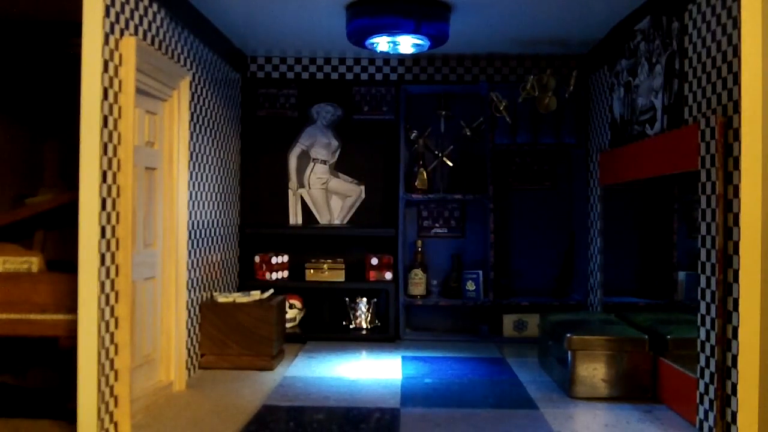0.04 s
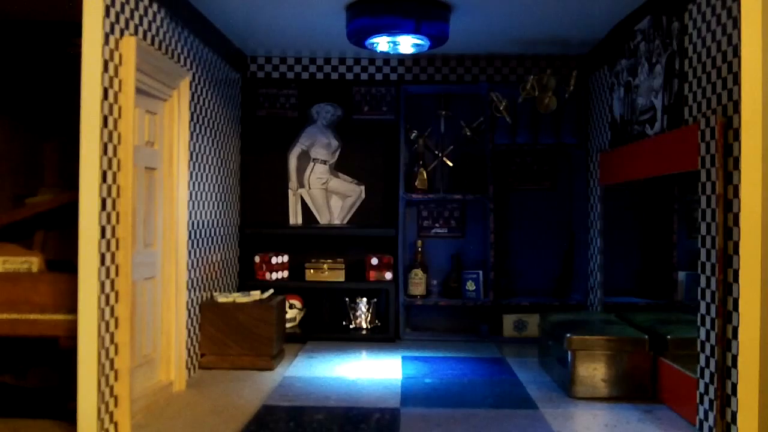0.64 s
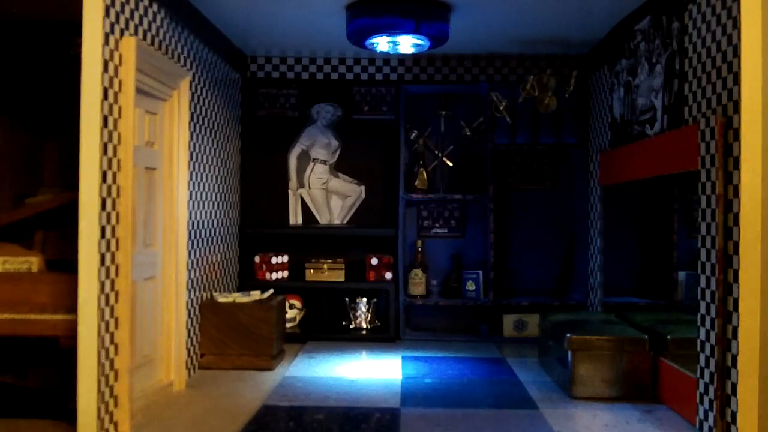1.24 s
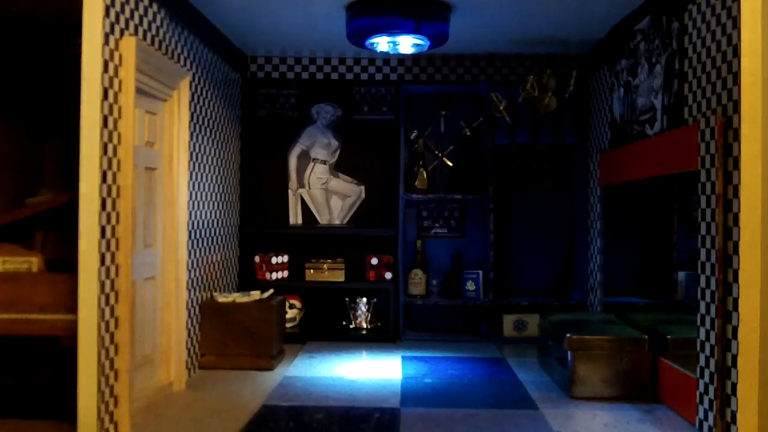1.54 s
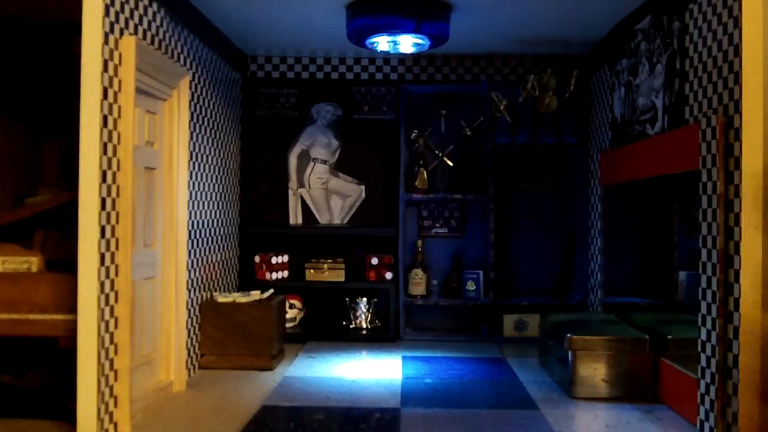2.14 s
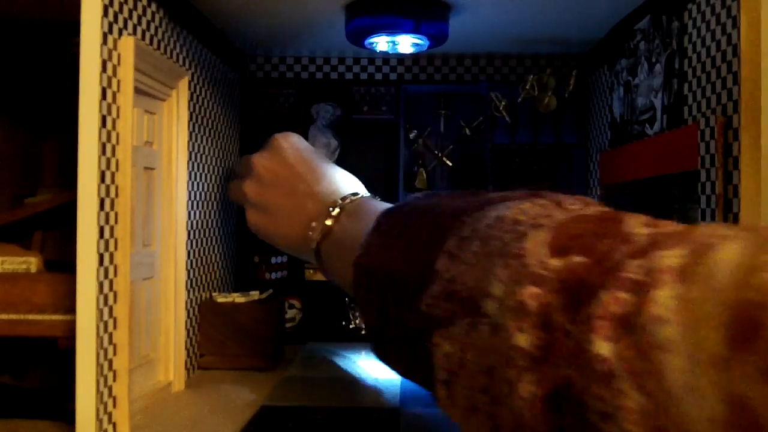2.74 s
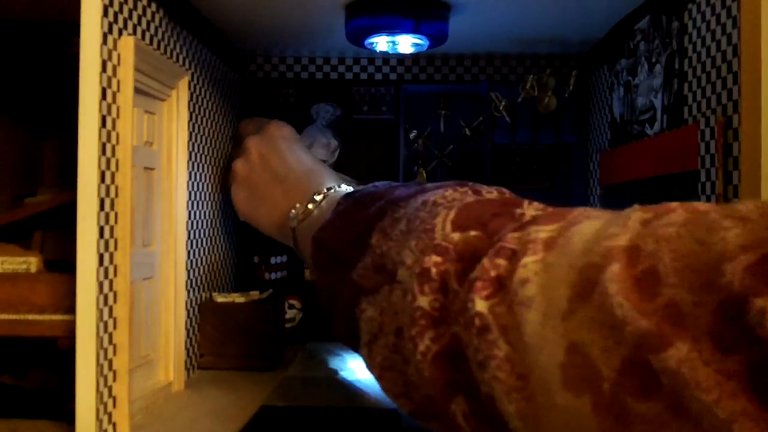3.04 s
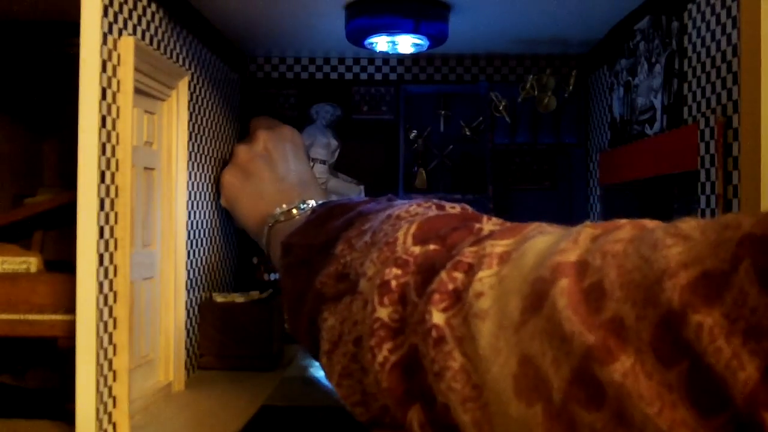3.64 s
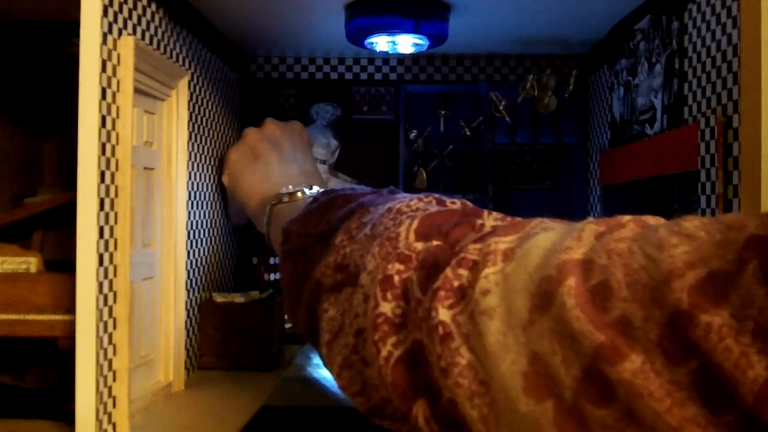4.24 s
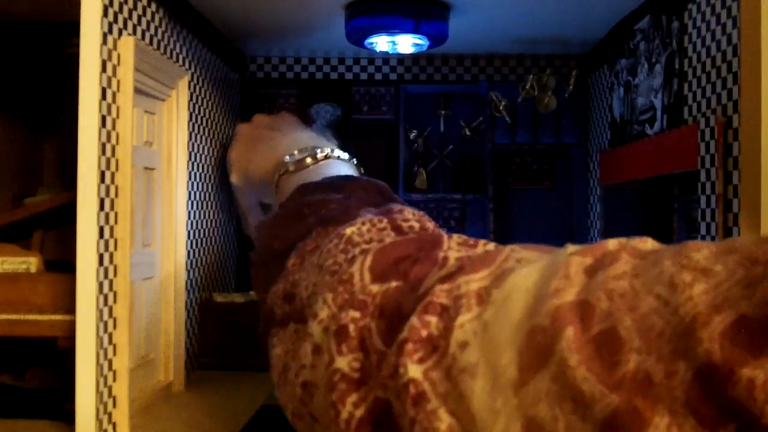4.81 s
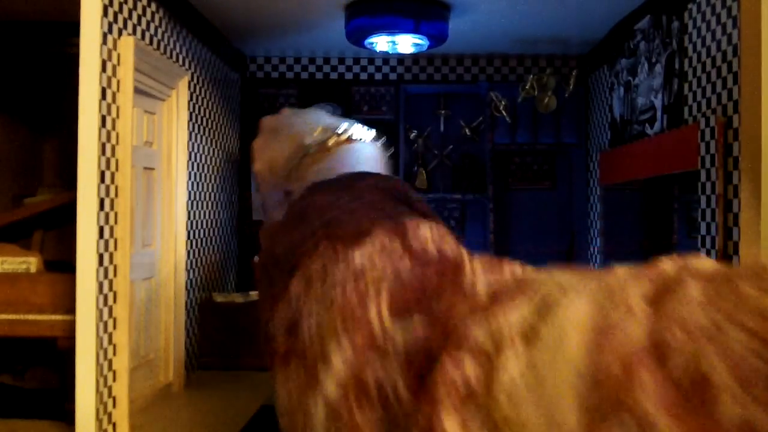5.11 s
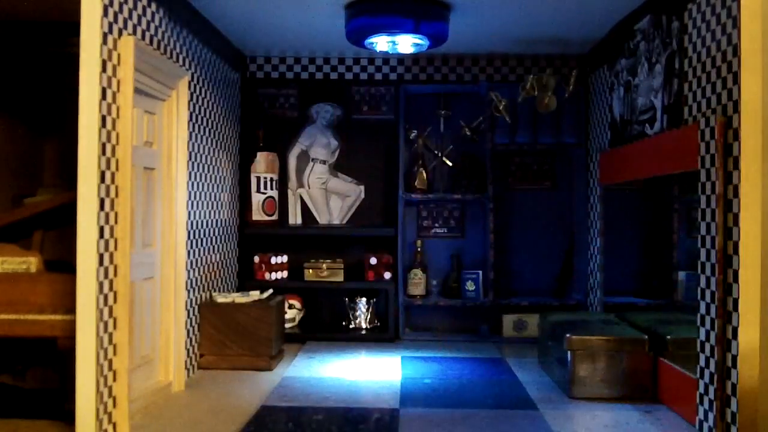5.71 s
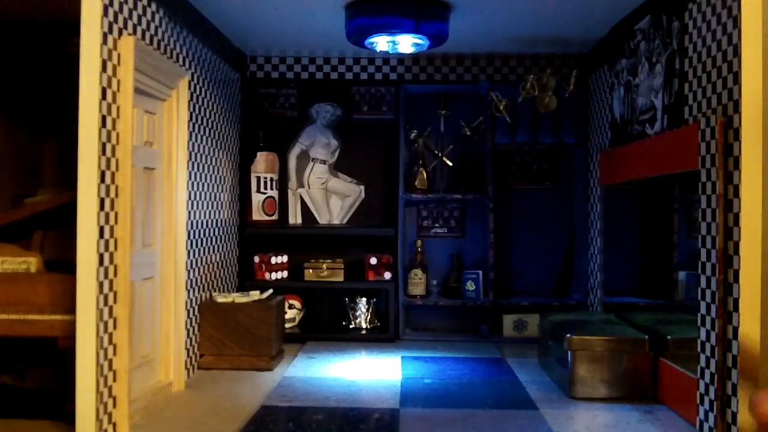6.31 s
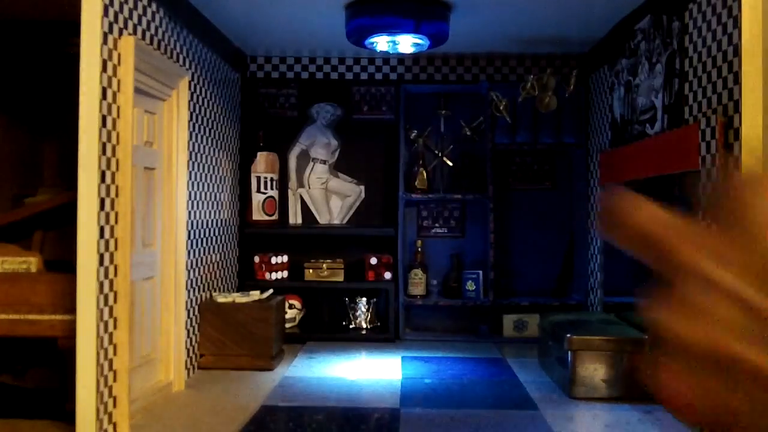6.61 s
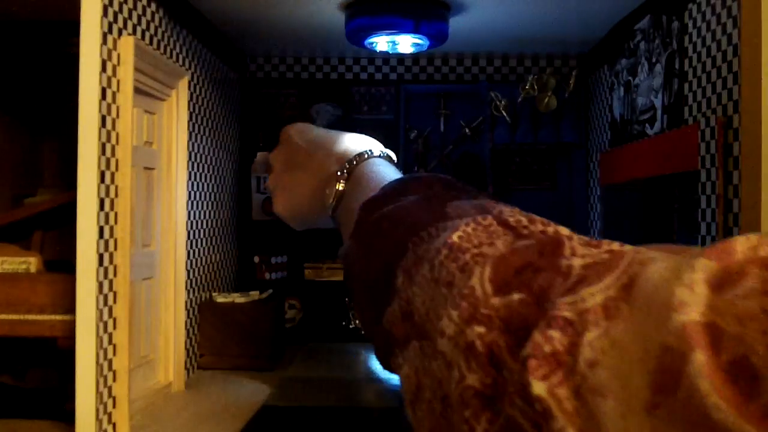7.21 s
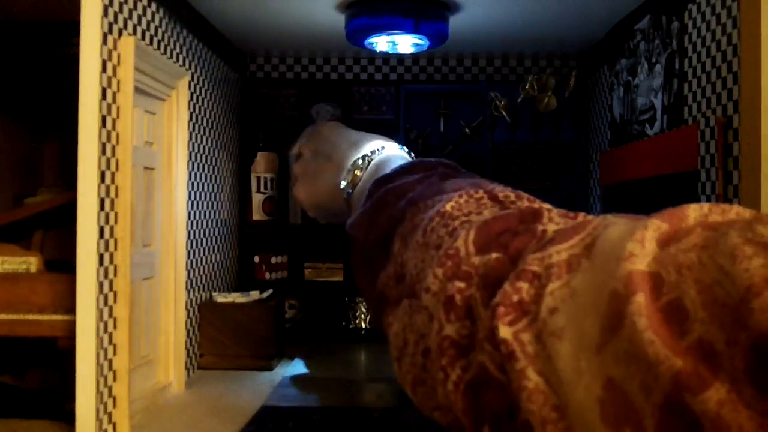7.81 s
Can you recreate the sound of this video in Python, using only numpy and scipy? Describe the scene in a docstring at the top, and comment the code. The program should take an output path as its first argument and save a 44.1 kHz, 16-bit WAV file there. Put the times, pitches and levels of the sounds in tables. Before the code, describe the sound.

In a quiet room, a hand arranges tiny props inside a wooden miniature room, close to the microphone. Soft scrapes and bumps lead to a sharp knock and a run of small hollow taps and slides. A sleeve swishes, a bracelet tinkles faintly and one dry click snaps by the microphone. After a pause, more knocks and scrapes follow, over low hum and hiss.

```python
"""A wooden miniature room in a quiet house, where a hand arranges tiny props on a shelf, close to a camera.
Each prop knocks, chatters and scrapes, and the thin box and the hollow prop ring with it.
Clothes rustle, a bracelet tinkles, the camera stand sways and one sharp click sounds by the microphone.
Under it all lie room tone, appliance hum, a faint ticking and microphone hiss."""
import sys
import numpy as np
from scipy import signal
from scipy.fft import rfft, irfft
from scipy.io import wavfile

SR = 44100
rng = np.random.default_rng(int(sys.argv[2]) if len(sys.argv) > 2 else 0)


def store_pcm(level_fs):
    """Save levels as 16-bit WAV."""
    pcm = np.round(np.clip(level_fs, -1, 1) * 32767).astype(np.int16)
    wavfile.write(sys.argv[1], SR, np.atleast_2d(pcm).T)


N = 351036
SIZE = 32768  # samples in one event or response
TIME = np.arange(N) / SR
AGE = np.arange(SIZE) / SR
FREQ = np.maximum(np.arange(SIZE // 2 + 1) * SR / SIZE, 1)


def undb(db):
    """Decibels to gain."""
    return 10 ** (np.asarray(db) / 20)


def unit(x):
    """Scale to rms 1."""
    return x / np.sqrt(np.mean(x ** 2))


def hit_level(x, db):
    """Set the level of a hit over its first 20 ms."""
    return x * undb(db) / np.sqrt(np.mean(x[:SR // 50] ** 2))


def fade(t60):
    """A decay that loses 60 dB in t60 seconds."""
    return np.exp(-np.log(1000) * AGE / t60)


def add(out, start, x):
    """Mix x into out from start seconds."""
    i = int(start * SR)
    out[i:i + len(x)] += x[:max(N - i, 0)]


def convolve(x, response):
    """Pass x through a response, keeping its length."""
    return signal.fftconvolve(x, response)[:len(x)]


def eq_curve(points):
    """Join (Hz, dB) points on a log-frequency axis."""
    hz, db = np.transpose(points)
    return np.interp(np.log(FREQ), np.log(hz), db)


def eq_response(db):
    """The minimum-phase impulse response of an EQ curve."""
    cepstrum = irfft(np.log(undb(db)))
    cepstrum[1:SIZE // 2] *= 2
    cepstrum[SIZE // 2 + 1:] = 0
    return irfft(np.exp(rfft(cepstrum)))


def scatter(t60):
    """A dying cloud of dense reflections with energy 1."""
    cloud = rng.standard_normal(SIZE) * fade(t60)
    return cloud / np.linalg.norm(cloud)


def noise(colour, db):
    """Noise of a given colour, at a steady or moving level."""
    white = rng.standard_normal(N + SIZE - 1)
    return undb(db) * unit(signal.fftconvolve(white, eq_response(eq_curve(colour)), "valid"))


def resonances(modes):
    """Damped modes, each peaking at its own gain in the spectrum."""
    return sum(undb(db) * 2 * np.log(1000) / (t60 * SR) * fade(t60) * np.cos(2 * np.pi * hz * AGE)
               for hz, db, t60 in modes)


def background(tone_db=-55.5, hiss_db=-60.5):
    """Room air, a low appliance hum and microphone hiss."""
    # The colours of air and hiss. Each row: frequency in Hz, gain in dB.
    air_colour = [(20, -14.5), (30, 13), (44, -9), (80, -3.5), (130, -2.5), (190, -7), (260, -3), (370, -5),
                  (520, -5.5), (1000, -8.5), (2000, -12), (4000, -14), (5500, -15), (7000, -18.5),
                  (9000, -48.5)]
    hiss_colour = [(1000, -31.5), (6000, -9.5), (7500, -1), (9000, 0.5), (11000, -0.5), (15000, -2)]
    # The hum's partials. Each row: frequency in Hz, level in dB.
    partials = [(48.4, -70.5), (188.4, -73.5), (376.8, -70.5)]
    hum = sum(undb(db) * np.sqrt(2) * np.sin(2 * np.pi * (hz * TIME + rng.random()))
              for hz, db in partials)
    return noise(air_colour, tone_db) + noise(hiss_colour, hiss_db) + hum


def ticking(hz=4220, width_hz=170, db=-73, ticks_per_s=10, first_s=0.076, sharpness=3):
    """A very faint, high ticking: pulses of noise in a narrow band."""
    pulses = np.exp(sharpness * (np.cos(2 * np.pi * ticks_per_s * (TIME - first_s)) - 1))
    band = signal.iirpeak(hz, hz / width_hz, fs=SR)
    return undb(db) * unit(signal.lfilter(*band, pulses * rng.standard_normal(N)))


def stand_sways(hz=10.8, t60=2.36, shudder_t60=0.87, ramp_s=0.035):
    """The bumped camera stand rocks below hearing, with a faint low shudder."""
    # Bumps to the stand. Each row: start in seconds, sway in dB, shudder in dB.
    sways = [(1.273, -28.5, -65), (1.875, -25, -38.5), (2.472, -32, -43)]
    out = np.zeros(N)
    lowpass = signal.butter(3, 48, fs=SR, output="sos")
    window = np.minimum(np.minimum(AGE, AGE[-1] - AGE) / ramp_s, 1)
    for start, db, shudder_db in sways:
        rock = -undb(db) * np.sin(2 * np.pi * hz * AGE) * fade(t60)
        rumble = unit(signal.sosfilt(lowpass, rng.standard_normal(SIZE)))
        shudder = undb(shudder_db) * rumble * fade(shudder_t60)
        add(out, start, window * (rock + shudder))
    return out


def swell_db(start, end, db, rise_db_per_s, fall_db_per_s):
    """A level that rises until start, holds until end and falls."""
    return db - rise_db_per_s * np.maximum(start - TIME, 0) - fall_db_per_s * np.maximum(TIME - end, 0)


def rustle(level_db, colour, flutter_db=2, folds_per_s=30):
    """Cloth hisses unevenly as its folds pass each other."""
    flutter = np.interp(TIME * folds_per_s, np.arange(SIZE), rng.standard_normal(SIZE))
    return noise(colour, level_db + flutter_db * flutter)


def clothes():
    """One long, dull shuffle before the arm reaches in, then sleeve swishes as it moves."""
    # Sleeve swishes. Each row: time of the peak in seconds, level in dB.
    swishes = [(4.9, -79), (5.64, -54.5), (6.95, -58.5)]
    # The colours of the cloth. Each row: frequency in Hz, gain in dB.
    sleeve_colour = [(300, -29), (1200, -7), (2500, -7), (5000, -11.5), (6500, -19), (9000, -22)]
    shuffle_colour = [(50, 2), (130, 1), (300, -3), (600, 0), (1100, -2), (1600, -9.5), (3000, -1.5),
                      (8000, -25.5)]
    shuffle_db = swell_db(start=1.23, end=2.6, db=-57.5, rise_db_per_s=9.5, fall_db_per_s=18)
    swishes_db = [swell_db(at, at, db, rise_db_per_s=65, fall_db_per_s=140) for at, db in swishes]
    return rustle(np.max(swishes_db, axis=0), sleeve_colour) + rustle(shuffle_db, shuffle_colour)


def bracelet(link_t60=0.016, jostle_t60=0.068):
    """Small metal links jostle on the wrist and ring briefly."""
    # The modes of a link. Each row: frequency in Hz, gain in dB.
    modes = [(2900, -3), (3550, 0), (4230, -7), (4950, -1), (5450, -9)]
    # Tinkles. Each row: start in seconds, level in dB.
    tinkles = [(4.368, -55.5), (4.93, -61), (5.322, -56), (5.365, -60), (5.433, -53.5)]
    out = np.zeros(N)
    link = sum(undb(db) * np.sin(2 * np.pi * hz * AGE) for hz, db in modes) * fade(link_t60)
    for start, db in tinkles:
        add(out, start, hit_level(convolve(scatter(jostle_t60), link), db))
    return out


def click(at_s=5.6983, db=-35.5, tail_db=-11, tail_t60=0.065, room_db=-19, room_t60=0.24):
    """A dry snap by the microphone, with a few close echoes and hardly any room."""
    # The snap's colour. Each row: frequency in Hz, gain in dB.
    colour = [(200, -28), (450, -21), (750, 0.5), (1400, -2.5), (2200, 3.5), (2800, -9.5), (3700, 8.5),
              (5000, -2), (6500, -12), (10000, -25), (16000, -36)]
    # The direct snap and its echoes off nearby surfaces. Each row: delay in seconds, gain.
    echoes = [(0, 0.53), (.0015, -0.058), (.0028, 0.22), (.0045, 0.14)]
    out = np.zeros(N)
    snap = undb(tail_db) * scatter(tail_t60) + undb(room_db) * scatter(room_t60)
    for delay, gain in echoes:
        snap[int(delay * SR)] += gain
    add(out, at_s, hit_level(convolve(snap, eq_response(eq_curve(colour))), db))
    return out


def box_ring():
    """The direct push plus the ring of the box: long panel modes and short cavity modes."""
    # The box's modes. Each row: frequency in Hz, gain over the direct push in dB, t60 in seconds.
    modes = [(184, -4, .17), (235, -5, .15), (338, 2, .12), (599, -4, .2), (639, 0, .2), (770, -5, .06),
             (850, 1, .2), (928, -1, .25), (1105, 4, .26), (1169, 5, .26), (1225, 5, .035), (1330, -4, .22),
             (1570, 4, .26), (1630, 3, .04), (1689, -1, .22), (1811, 1, .22), (1958, 5, .16),
             (2490, -1, .15), (2602, 4, .12), (2767, 1, .08), (3158, -3, .25), (3340, -2, .06),
             (3660, 4, .07), (3720, 4, .14), (4220, -3, .04), (4930, -4, .05)]
    return signal.unit_impulse(SIZE) + resonances(modes)


def prop_rings(contacts):
    """Contacts made while a hollow prop is held ring that prop too."""
    # Held props. Each row: start and end in seconds, modes as (frequency in Hz, gain in dB, t60 in s).
    props = [(2.8, 4.6, [(726, -6.5, 0.015), (1210, -9, 0.02), (2560, -8, .02), (3800, -5, .02),
             (5000, -2, .06)]), (7.3, 8, [(1244, -9, 0.044), (2710, 0, 0.039), (4280, 4, .04)])]
    return sum(convolve(contacts * (TIME > start) * (TIME < end), resonances(modes))
               for start, end, modes in props)


def contact(force, box, bass_db, treble_db, ring_hz, ring_db, bass_hz=480, treble_hz=2500):
    """A force sounds the box: weight brings out bass, a hard edge treble, the prop a damped ring."""
    # The broad tone of shelf and box. Each row: frequency in Hz, gain in dB.
    wood_colour = [(60, -31), (120, -24.5), (170, -4), (280, -12.5), (450, -3.5), (700, 1), (1200, -2.5),
                   (1850, -1.5), (2150, -2), (2700, -11), (3100, -9.5), (5200, -18), (7000, -27),
                   (11000, -64)]
    bass = 1 / (1 + (FREQ / bass_hz) ** 4)
    treble = 1 / (1 + (treble_hz / FREQ) ** 6)
    ring = 1 / (1 + (np.log(FREQ / ring_hz) / .08) ** 2)  # a peak about 8 % wide on each side
    colour = eq_response(eq_curve(wood_colour) + bass_db * bass + treble_db * treble + ring_db * ring)
    return convolve(convolve(force, colour), box)


def touch(t60, first_touch=0.14, seat_s=0.00063):
    """A first touch, then dense chatter between prop, shelf and close walls as the prop seats."""
    return first_touch * signal.unit_impulse(SIZE) + scatter(t60) * np.minimum(AGE / seat_s, 1)


def bumps(box, bass_db=21.5, treble_db=-8.5, ring_db=10):
    """Soft, heavy touches bring out the low ring of the box."""
    # Bumps. Each row: start in seconds, level in dB, chatter t60 in seconds, ring in Hz.
    hits = [(0.942, -49.5, 0.28, 303), (1.894, -46, 0.14, 900), (2.547, -52.5, 0.21, 455),
            (2.866, -42.5, 0.18, 172), (3.4652, -31, 0.055, 326), (3.4892, -40, 0.07, 340),
            (3.804, -50.5, 0.051, 327), (4.065, -41, 0.077, 338), (4.395, -50, 0.033, 300),
            (7.39, -45, .3, 244), (7.5401, -39, 0.054, 245)]
    out = np.zeros(N)
    for start, db, t60, ring_hz in hits:
        thud = contact(touch(t60), box, bass_db, treble_db, ring_hz, ring_db)
        add(out, start, hit_level(thud, db))
    return out


def stroke(attack, length, sag_db_per_s=34, release_t60=0.13):
    """The pressure of one stroke: attack, sagging hold, release."""
    release = np.exp(-np.log(1000) * np.maximum(AGE - length, 0) / release_t60)
    return np.minimum(AGE / attack, 1) * undb(-sag_db_per_s * AGE) * release


def slides(box, slips_per_s=1800, spread_db=3.0, grit=0.27):
    """A prop sticks and slips across the shelf; a firm grip adds bass and treble."""
    # Strokes. Each row: start, attack and length in seconds, level in dB, grip in dB,
    # ring in Hz, ring boost in dB.
    strokes = [(0.52, .02, 0.08, -51, -5, 545, 18), (0.609, 0.0055, 0.12, -38, -6.5, 1100, 7),
               (0.734, 0.0081, 0.044, -48, -16, 1490, 10), (2.332, .012, 0.022, -50, -17, 586, 23),
               (2.875, 0.0089, 0.11, -33, 1.5, 1200, 3.5), (2.902, 0.015, 0.026, -23, -1.5, 1560, 4),
               (3.087, 0.034, .078, -35, 4.5, 1550, 8), (3.272, .035, .11, -38, 0, 850, 11),
               (3.414, 0.016, 0.013, -39.5, 8.5, 5200, 11), (3.523, 0.024, 0.196, -48.5, 9.5, 422, -3),
               (3.868, 0.015, 0.063, -47, 8.5, 810, 11), (4.046, 0.0096, 0.026, -43, 10, 790, -1),
               (4.422, 0.0066, 0.034, -47.5, -1, 670, 8), (7.402, 0.014, 0.093, -36.5, 6.5, 1580, 8),
               (7.553, 0.018, 0.034, -39.5, 8, 272, 16.5), (7.682, .02, 0.029, -49, 7, 253, 12),
               (7.848, 0.017, 0.13, -45, 0.5, 232, 15.5)]
    out = np.zeros(N)
    for start, attack, length, db, grip_db, ring_hz, ring_db in strokes:
        slips = rng.random(SIZE) < slips_per_s / SR
        strength = undb(spread_db * np.clip(rng.standard_normal(SIZE), -2, 2))
        friction = slips * strength * rng.choice([-1, 1], SIZE) + grit * rng.standard_normal(SIZE)
        pressure = undb(db) * stroke(attack, length)
        weight_db = 4 + 0.94 * (-38 - db)  # the softer the stroke, the more the hand's weight dominates
        scrape = contact(friction * pressure, box, weight_db + grip_db, grip_db, ring_hz, ring_db)
        add(out, start, scrape * np.linalg.norm(pressure) / np.linalg.norm(scrape))
    return out


def knocks(box, rock_s=.0042, rock_db=-6, chatter_t60=0.062):
    """A prop lands on one edge, rocks more softly onto the other and chatters to rest."""
    # Hard knocks. Each row: start in seconds, level, bass and treble in dB,
    # ring of the first and of the second edge in Hz, ring boost in dB.
    hits = [(2.8597, -20, -13, 1, 1890, 1150, 0), (3.255, -40.5, 13, 7.5, 613, 257, 13),
            (3.305, -37.5, 3.5, -7, 1090, 860, -3), (3.4629, -39.5, 19, 7, 1430, 250, 10),
            (3.898, -46, 0, -18, 864, 860, 6), (4.031, -48.5, 0, 0, 774, 1100, 9),
            (4.07, -42, 13, 7, 797, 1630, 20), (4.404, -49, 12, 5, 1880, 2400, 11),
            (4.418, -41, 11, 7, 2020, 720, 2), (7.384, -28.5, 7, 4.5, 2530, 1220, 15.5),
            (7.533, -28.5, -3, 3, 1790, 2410, 6.5), (7.933, -41.5, 7, 1, 2320, 1204, 3)]
    out = np.zeros(N)
    for start, db, bass_db, treble_db, first_hz, second_hz, ring_db in hits:
        first = contact(touch(chatter_t60), box, bass_db, treble_db, first_hz, ring_db)
        second = contact(touch(chatter_t60), box, bass_db, treble_db, second_hz, ring_db)
        add(out, start, hit_level(first, db))
        add(out, start + rock_s, hit_level(second, db + rock_db))
    return out


def scene(room_db=-15.0, room_t60=0.89):
    """The props in their box, softly echoed by the room, over the small dry sounds and the noise bed."""
    box = box_ring()
    contacts = knocks(box) + bumps(box) + slides(box)
    props = contacts + prop_rings(contacts)
    room = undb(room_db) * convolve(props, scatter(room_t60))
    mix = props + room + clothes() + bracelet() + click() + stand_sways() + ticking() + background()
    return mix[None]


def record(dry, top_hz=15300):
    """The camera notches two treble bands and cuts the top."""
    # Stop bands. Each row: centre in Hz, width in Hz.
    notches = [(7870, 2730), (11860, 370)]
    for hz, width_hz in notches:
        dry = signal.lfilter(*signal.iirnotch(hz, hz / width_hz, fs=SR), dry)
    return signal.sosfilt(signal.ellip(10, .2, 70, top_hz, fs=SR, output="sos"), dry)


dry = scene()
out = record(dry)
store_pcm(out)
```